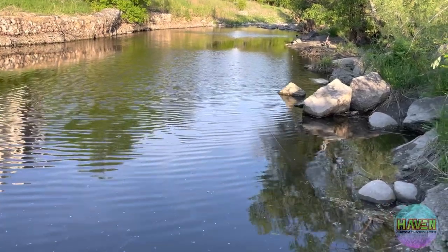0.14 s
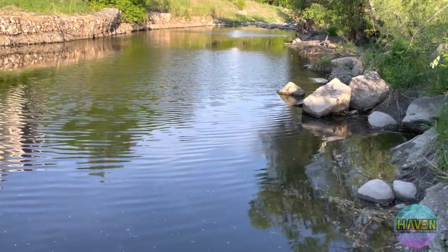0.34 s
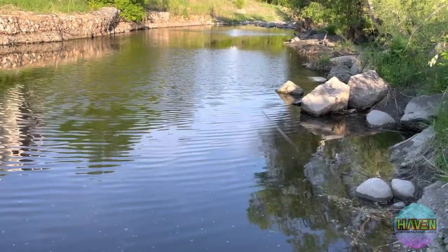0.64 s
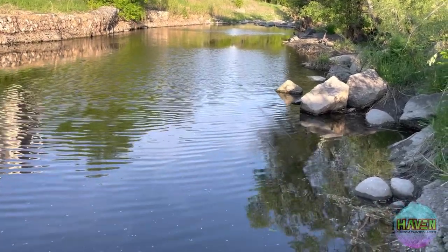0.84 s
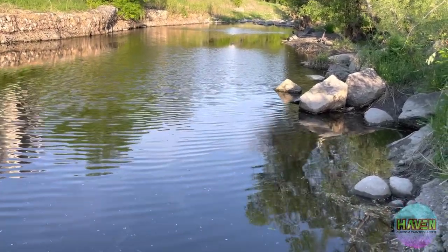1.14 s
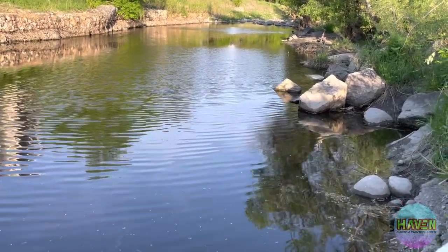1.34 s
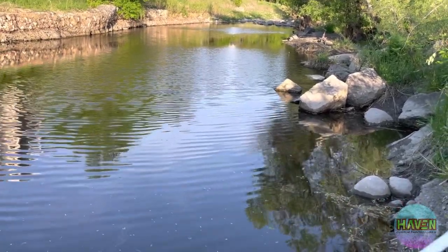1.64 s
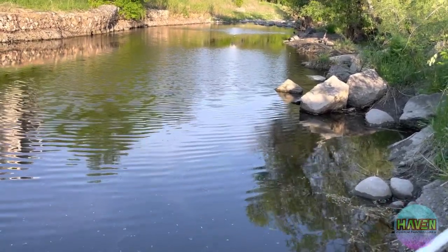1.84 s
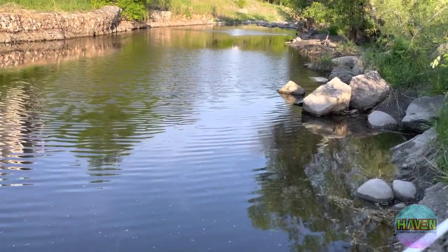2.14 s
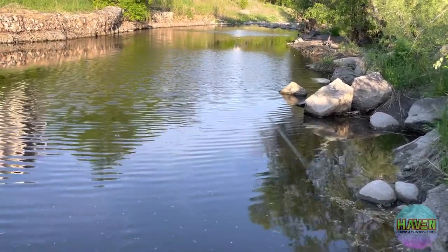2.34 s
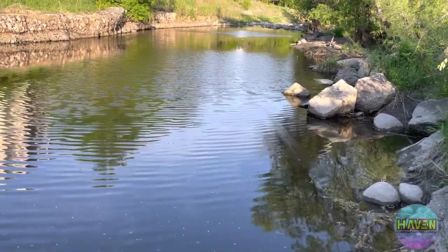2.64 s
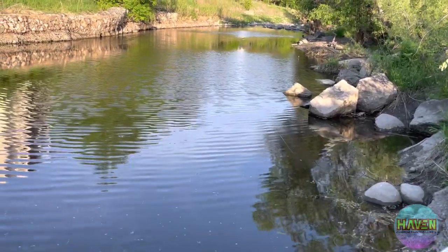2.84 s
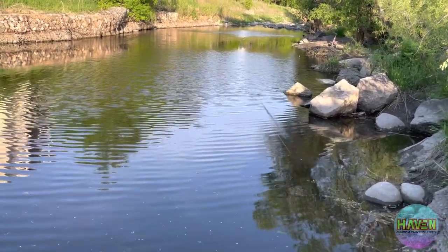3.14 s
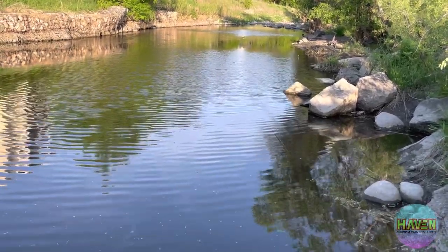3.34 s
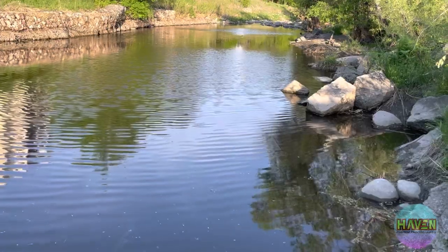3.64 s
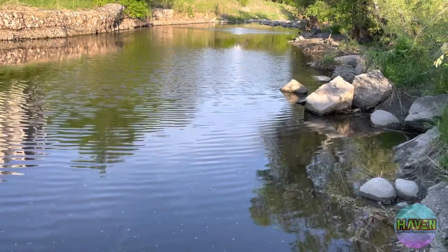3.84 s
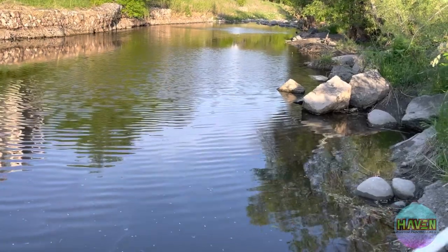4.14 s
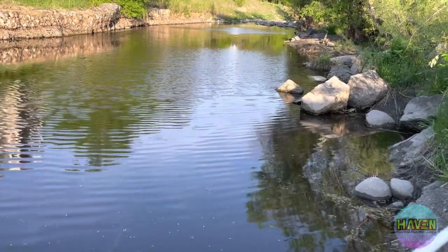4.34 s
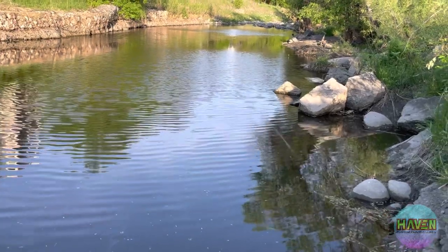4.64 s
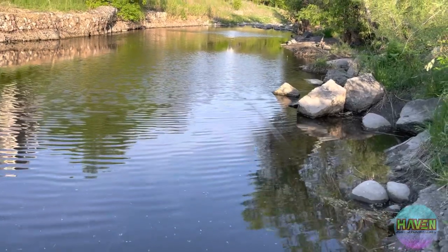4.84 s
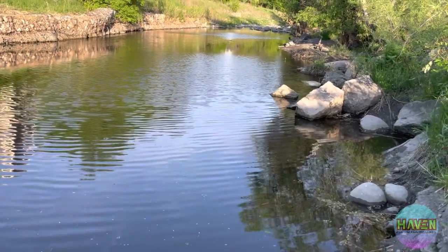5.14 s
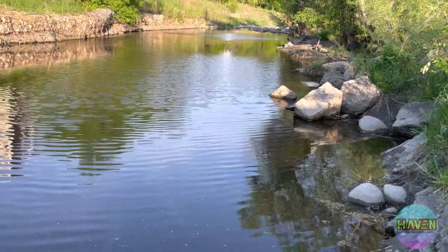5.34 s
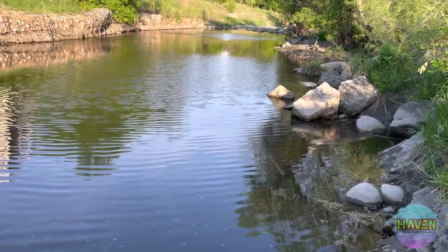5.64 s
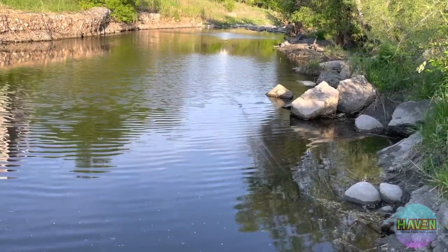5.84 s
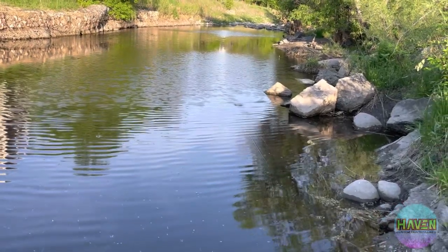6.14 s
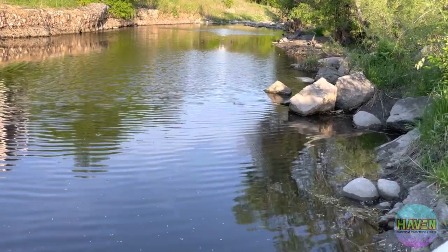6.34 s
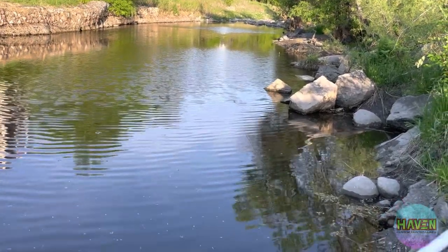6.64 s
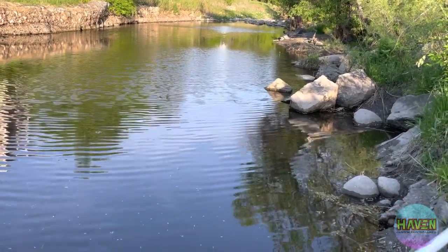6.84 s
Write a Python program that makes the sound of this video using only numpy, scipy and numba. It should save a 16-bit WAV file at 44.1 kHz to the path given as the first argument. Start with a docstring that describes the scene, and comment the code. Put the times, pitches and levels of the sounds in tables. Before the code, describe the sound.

Open air by a quiet pond or creek, heard through a hand-held phone; the water itself is silent. Throughout, a distant road gives a soft, bass-heavy roar with gentle swells and faint hiss. Over it a far engine drones, a smooth low hum near 97 hertz sinking to roughly 91, its harmonics fading separately in and out. It is present at the start, dips around 0.5, returns near 1.2, wavers through 3 to 5, and is strongest around 6 to 6.6 seconds. Close by, handled gear makes light dry ticks and short rising swishes: a cluster at 0.5 to 0.8, a few at 2.2 to 2.4, more from 2.9 to 3.3, the busiest rubbing and clicking from 3.6 to 4.1, then sparse ones at 4.6 and 5.4 to 6.1. Faint rubbing continues to 6.7. A barely perceptible, very high whine strengthens briefly near 6.

```python
"""Open air by a creek, with a hand-held phone as the microphone; no water is heard. A steady engine drones
in the distance: five sine harmonics of a slowly sinking note fade in and out on shifting air and ground
paths. Close by, gear rustles (random slips through moving resonances) and ticks (short decaying rings).
A faint pair of high tones whines, stronger once near 6 s. Filtered noise makes the distant road roar."""
import sys
import numpy as np
from scipy import signal
from scipy.fft import rfft, irfft, next_fast_len
from scipy.io import wavfile
from scipy.ndimage import uniform_filter1d
from numba import njit

SR = 44100
rng = np.random.default_rng(int(sys.argv[2]) if len(sys.argv) > 2 else 0)


def wav_record(signal):
    """Record a signal, one row per channel, as 16-bit PCM in the file named by sys.argv[1]."""
    frames = np.transpose(np.atleast_2d(signal))
    bounded = np.clip(frames, -1, 1)
    # unit amplitude maps onto the largest positive 16-bit level
    quanta = np.round(bounded * 32767).astype(np.int16)
    wavfile.write(sys.argv[1], SR, quanta)


def nominal_scale(level):
    """Amplitude ratio for a level in decibels (scalar or array-like)."""
    x = np.asarray(level, float) / 20
    return 10 ** x


N = 308259
TIME = np.arange(N) / SR

# relative spectrum of the bright sheen of gear, mid channel: pitch_hz, density_db (dB per Hz)
SHEEN_MID_SPECTRUM = [(8300, -22.5), (9300, -3.5), (11000, -2.5), (13500, -12.5), (14200, -27), (16000, -5)]
# the same for its side channel: pitch_hz, density_db (dB per Hz)
SHEEN_SIDE_SPECTRUM = [(4000, -30), (6000, -15), (7800, 2.5), (9800, -4), (11200, -25), (14000, -8.5),
                       (15700, -5.5)]


def curve(rows):
    """Columns of a table, interpolated over time."""
    s, *columns = np.transpose(rows)
    return [np.interp(TIME, s, column) for column in columns]


def colour(x, points):
    """Shape the spectrum of x by (Hz, dB) points, then set its rms to 1."""
    size = next_fast_len(len(x))
    hz, db = np.transpose(points)
    bin_hz = np.arange(size // 2 + 1) * SR / size
    gain = nominal_scale(np.interp(np.log(bin_hz + 1), np.log(hz), db, left=-120))
    y = irfft(rfft(x, size) * gain, size)[:len(x)]
    return y / np.sqrt(np.mean(y ** 2))


def walk(rate):
    """Random levels held 1 / rate s and smoothed twice; spread near 1."""
    hold = int(SR / rate)
    steps = np.repeat(rng.standard_normal(N // hold + 1), hold)
    smooth = uniform_filter1d(uniform_filter1d(steps, hold), hold)
    return 1.67 * smooth[:N]


def stereo(mid, side):
    """Left and right from mid and side."""
    return np.array([mid + side, mid - side])


def envelope(start, length, edges):
    """Gain 1 while it lasts, fading in and out by so many dB a second."""
    before, after = np.maximum(start - TIME, 0), np.maximum(TIME - start - length, 0)
    return nominal_scale(-edges[0] * before - edges[1] * after)


def engine():
    """Clean harmonics of the firing rate; turbulent air shakes phase and level of each a little."""
    # how each harmonic arrives: side_re_mid_db, side_phase_rad
    arrival = [(-26.5, 0.33), (-13.5, 0.35), (-25, 0.27), (-18.5, .3), (-9.5, 0.33)]
    # level of each harmonic before the random shaking: time_s, level_db
    first = [(0, -32), (.31, -53), (1.24, -37), (1.55, -39), (1.9, -56), (2.2, -51.5), (2.72, -33.5),
             (2.96, -52), (3.58, -31.5), (3.76, -35.5), (3.9, -32.5), (4.17, -42.5), (4.3, -36),
             (4.7, -37.5), (4.9, -49), (5.4, -32), (5.62, -37), (5.78, -31), (5.92, -30), (6.03, -26.5),
             (6.27, -23.5), (6.6, -26), (6.85, -36.5), (6.99, -27.5)]
    second = [(0, -58), (.7, -52), (1.24, -32), (1.52, -55.5), (2.2, -45), (2.53, -55.5), (3.08, -36.5),
              (3.55, -43.5), (3.78, -40), (4.2, -50.5), (4.62, -42), (4.9, -35), (5.2, -42.5),
              (5.34, -62.5), (5.47, -43.5), (5.6, -46.5), (6.0, -37.5), (6.33, -32), (6.6, -42.5),
              (6.85, -52.5), (6.99, -40)]
    third = [(0, -53), (.7, -55), (.97, -47.5), (1.24, -42.5), (1.55, -45), (1.9, -61.5), (2.03, -47),
             (2.2, -37.5), (2.5, -46), (2.78, -47.5), (2.94, -58), (3.1, -47), (3.6, -51.5), (3.9, -64),
             (4.3, -53.5), (4.63, -41.5), (4.88, -50.5), (5.45, -52), (5.6, -59), (5.8, -55.5),
             (5.95, -40.5), (6.1, -46), (6.26, -66), (6.37, -43), (6.7, -48.5), (6.85, -57), (6.99, -58)]
    fourth = [(0, -80.5), (.97, -53), (1.3, -64), (1.9, -70), (2.03, -48), (2.3, -55), (2.67, -46),
              (2.95, -51), (3.5, -53.5), (3.9, -70), (4.3, -53.5), (5.2, -64), (5.47, -48.5), (5.6, -58),
              (5.77, -53.5), (5.93, -64.5), (6.3, -55.5), (6.42, -42.5), (6.56, -57), (6.7, -66),
              (6.99, -53)]
    fifth = [(0, -80), (.66, -51.5), (.95, -67), (1.9, -68.5), (2.2, -47), (2.5, -64), (2.75, -52.5),
             (3.3, -58.5), (3.76, -54), (4.0, -64.5), (5.001, -58), (6.2, -62), (6.42, -53.5), (6.99, -70)]
    # the rate as heard sinks ever more slowly from the start towards the limit
    start_hz, limit_hz, sink_s = 97.12, 84.2, 12.0
    flutter_db, flutter_per_s = 3, 8

    firing_hz = limit_hz + (start_hz - limit_hz) * np.exp(-TIME / sink_s)
    phase = 2 * np.pi * np.cumsum(firing_hz) / SR
    levels = curve(first) + curve(second) + curve(third)
    for rows in (fourth, fifth):
        levels.append(curve(rows)[0] + flutter_db * walk(flutter_per_s))
    out = 0
    for k, (db, (side_db, lead)) in enumerate(zip(levels, arrival), 1):
        # higher harmonics are shaken more
        turn = k * phase + rng.uniform(0, 2 * np.pi) + 0.08 * k * walk(12)
        size = np.sqrt(2) * nominal_scale(db + 0.35 * k * walk(14))
        side = nominal_scale(side_db + 3.3 * walk(1.5)) * np.sin(turn + lead)
        out = out + size * stereo(np.sin(turn), side)
    return out


@njit
def band(x, hz, share):
    """Band-pass whose centre moves; width is a share of the centre."""
    y, b, l = np.empty(len(x)), 0., 0.  # b and l: the two filter memories
    for i in range(len(x)):
        g = np.tan(np.pi * hz[i] / SR)
        v = (b + g * (x[i] - l)) / (1 + g * (g + share))
        b, l, y[i] = 2 * v - b, l + 2 * g * v, share * v
    return y


def quarter(x):
    """x a quarter cycle late, as the far port hears an off-axis source."""
    return signal.hilbert(x, next_fast_len(N)).imag[:N]


def handling():
    """Gain and pitch of the body and gain of the sheen, summed over swishes and rubs of gear."""
    # swishes, a rising hollow note then a bright sheen:
    # start_s, length_s, body_gain_db, body_start_hz, sheen_gain_db, sheen_lag_s
    swishes = [(.575, .055, -65.5, 4820, -69.5, 0.03), (2.268, 0.052, -63.5, 5410, -66.5, .022),
               (3.03, 0.085, -66, 4770, -78, 0.027), (4.63, 0.056, -66.5, 4890, -72.5, 0.042),
               (5.638, .05, -64.5, 4580, -66.5, .045)]
    # slower rubbing: start_s, length_s, body_gain_db, body_hz, sheen_gain_db
    rubs = [(.45, .12, -76, 4520, -82), (.735, 0.024, -72.5, 5170, -78.5), (1.03, .13, -81, 4430, -83.5),
            (1.48, .25, -81.5, 4270, -85.5), (2.22, .06, -83.5, 4940, -85), (2.33, 0.062, -74, 3600, -82),
            (2.92, .01, -78.5, 4370, -80), (3.23, .12, -81.5, 4480, -84), (3.53, .02, -83.5, 3340, -81),
            (3.66, 0.055, -74, 3380, -87), (3.81, .11, -71, 3040, -82.5), (3.93, 0.055, -69, 3110, -80),
            (4.04, 0.03, -75, 2990, -88), (4.56, .08, -81.5, 4700, -86.5), (5.38, 0.14, -78, 3600, -87.5),
            (5.595, 0.054, -82, 4340, -75.5), (5.92, 0.16, -78.5, 5150, -98), (6.3, 0.12, -80, 5040, -83),
            (6.42, .3, -76, 5400, -93)]
    # fades in and out in dB per second; rise is the share of pitch gained over a swish
    swish_edges, swish_rise = (898.5, 601), 0.14
    rub_edges = (201, 299.5)

    body, sheen, weighted_hz = 1e-6, 1e-6, 1e-6 * 4400.  # a trace, so the pitch is always defined
    for rows, edges, rise in ((swishes, swish_edges, swish_rise), (rubs, rub_edges, 0)):
        for s, length, body_db, body_hz, sheen_db, *lag in rows:
            gain = nominal_scale(body_db) * envelope(s, length, edges)
            progress = np.clip((TIME - s) / length, 0, 1)
            body = body + gain
            weighted_hz = weighted_hz + gain * body_hz * (1 + rise * progress)
            sheen = sheen + nominal_scale(sheen_db) * envelope(s + sum(lag), length, edges)
    return body, weighted_hz / body, sheen


def rustle():
    """Rubbing surfaces: dense uneven micro-slips ring a cavity, and another below, that shift with the grip."""
    body_gain, hz, sheen_gain = handling()
    slip_sizes = nominal_scale(2.4 * rng.exponential(size=N)) * rng.standard_normal(N)
    slips = (rng.random(N) < 0.05) * slip_sizes
    rub = (slips + 0.3 * rng.standard_normal(N)) * nominal_scale(1.6 * walk(90))
    hz = hz * (1 + 0.05 * walk(60))
    upper = band(band(rub, hz, 0.4), hz, 0.53)
    lower = band(rub, 0.6 * hz, 0.5)
    body = upper + 0.72 * lower
    body = body_gain * body / np.sqrt(hz / hz.mean()) / np.std(body)
    sheen_side = nominal_scale(4.0) * quarter(colour(rub, SHEEN_SIDE_SPECTRUM))
    sheen = stereo(colour(rub, SHEEN_MID_SPECTRUM), sheen_side)
    # the two microphone ports cancel in the mid at one pitch (Hz, then notch Q)
    front = signal.lfilter(*signal.iirnotch(8340, 2.5, SR), body)
    # the side grows with pitch
    body_side = hz / 9000 * quarter(body) - 0.1 * body
    return stereo(front, body_side) + sheen_gain * sheen


def ticks():
    """Each tick of gear rings a few cycles at its pitch, with a brighter noise crack on top."""
    # start_s, ring_gain_db, pitch_hz, crack_gain_db, left_minus_right_db
    tick_rows = [(0.4932, -57, 5010, -61.5, 4), (0.5217, -52, 3190, -63, -8), (0.612, -51, 3520, -63, -5.5),
                 (0.621, -43.5, 3660, -55.5, -5), (0.7426, -58, 4880, -58.5, -4.5),
                 (0.7585, -52, 5480, -61.5, 2.5), (2.2428, -52, 3240, -61.5, -3),
                 (2.3714, -41.5, 2900, -63.5, -8.5), (2.9225, -51, 3990, -59.5, 4.5),
                 (3.0374, -41.5, 3120, -58.5, -5.5), (3.141, -46, 5000, -60, -10),
                 (3.255, -67, 3200, -58, 4), (3.6557, -45.5, 3620, -73, -13),
                 (3.6835, -50, 6000, -79.5, -7), (3.712, -44, 3450, -67.5, -2.5),
                 (3.7247, -47, 3100, -71, -2), (3.79, -50, 3100, -63, -12), (3.9394, -51, 3180, -60.5, 3.5),
                 (3.9484, -47, 3110, -56.5, -10), (3.968, -45, 3250, -53.5, -3.5),
                 (3.9868, -46, 3360, -46.5, 1), (4.0497, -52, 3930, -56.5, -8), (4.564, -53, 4800, -71, -5),
                 (4.6327, -62, 5730, -69.5, -3.5), (5.465, -51, 3870, -73.5, -2),
                 (5.5717, -53, 3100, -70, 9), (5.6413, -56, 4670, -61.5, 0.5),
                 (5.751, -48, 3800, -70, -0.5), (6.101, -51, 3160, -73, -1)]
    out, t = np.zeros((2, N)), np.arange(300) / SR
    cracks = rng.standard_normal((len(tick_rows), len(t)))
    for (s, db, hz, crack_db, pan_db), crack in zip(tick_rows, cracks):
        ring_shape = (1 - np.exp(-t / 0.0002)) * np.exp(-t / 0.0007)  # attack and decay in s
        ring = nominal_scale(db) * np.sin(2 * np.pi * hz * t) * ring_shape
        crack_side = 1.7 * colour(crack[::-1], SHEEN_SIDE_SPECTRUM)
        snap = stereo(colour(crack, SHEEN_MID_SPECTRUM), crack_side)
        snap = nominal_scale(crack_db) * snap * np.exp(-t / 0.00068)
        pan = nominal_scale(np.array([[pan_db], [-pan_db]]) / 2)
        i = int(s * SR)
        out[:, i:i + len(t)] += pan * (ring + snap)
    return out


def whine():
    """A faint pair of high tones with wandering phase, stronger for a moment."""
    tones = sum(np.sin(2 * np.pi * hz * TIME + 0.6 * walk(30)) for hz in (11910, 12090))
    # added strength: start s, length s, fades in and out in dB per second
    surge = nominal_scale(-97) * envelope(5.85, 0.75, (45, 45))
    return (nominal_scale(-104) + surge) * stereo(tones, 0.3 * tones)


def road():
    """Distant roar: exhaust bass and tyre noise swell apart; the far hiss is even, but its top varies."""
    # swells: time_s, bass_gain_db, tyre_gain_db
    swells = [(0, -39.5, -44.5), (.7, -37, -39.5), (1.9, -39, -41.5), (2.55, -40, -36.5), (3.6, -37.5, -41),
              (4.7, -35.5, -41), (6.2, -39.5, -41.5), (6.4, -38, -38), (6.99, -36, -47.5)]
    # relative spectra of the roar, mid and side: pitch_hz, density_db (dB per Hz)
    roar_mid = [(15, -45), (25, -25.5), (64, 2), (96, 0), (147, -6.5), (233, -9), (334, -13.5),
                (564, -14.5), (717, -23), (913, -21), (1060, -25), (1210, -33), (1670, -30), (2400, -41),
                (3200, -47), (4500, -53.5), (6500, -62.5), (8300, -74.5), (9800, -73), (13500, -73),
                (14500, -91)]
    roar_side = [(15, -28.5), (40, -14.5), (68, -1.5), (110, 2), (206, -2), (328, -4.5), (480, -5),
                 (777, -10.5), (1070, -10.5), (2120, -30.5), (4000, -41), (8000, -48), (11200, -67),
                 (14000, -55.5), (15700, -64)]
    # gain of the far hiss above about 2 kHz: time_s, gain_db
    hiss_top = [(0, -1.5), (2, -1.5), (2.6, 1), (4, -2.5), (5, -5), (6.99, -5)]

    bass_db, tyre_db = curve(swells)
    mid = colour(rng.standard_normal(N), roar_mid)
    side = nominal_scale(-10.5) * colour(rng.standard_normal(N), roar_side)
    wide = stereo(mid, side)
    # split: bass below 200 Hz, hiss above 750 Hz, tyres between
    bass = signal.sosfiltfilt(signal.butter(2, 200, fs=SR, output="sos"), wide)
    hiss = signal.sosfiltfilt(signal.butter(2, 750, "high", fs=SR, output="sos"), wide)
    tyres = wide - bass - hiss
    top = signal.sosfiltfilt(signal.butter(2, 2100, "high", fs=SR, output="sos"), hiss)
    hiss = hiss + top * (nominal_scale(curve(hiss_top)[0]) - 1)
    bass = bass * nominal_scale(np.array([[0.6], [-0.6]]))  # a little from the left
    tyres = tyres * nominal_scale(tyre_db + 0.74 * walk(9))
    return bass * nominal_scale(bass_db) + tyres + hiss * nominal_scale(-37.5)


def scene():
    """All sources in the open air, eased in over the first 6 ms."""
    mix = engine() + rustle() + ticks() + whine() + road()
    return mix * np.minimum(TIME / 0.006, 1)


def band_limit(x):
    """A steep low-pass at the top of the band."""
    return signal.sosfilt(signal.butter(12, 15700, fs=SR, output="sos"), x)


def record(dry):
    """The finished mix as the hand-held phone keeps it."""
    return band_limit(dry)


dry = scene()
out = record(dry)
wav_record(out)
```